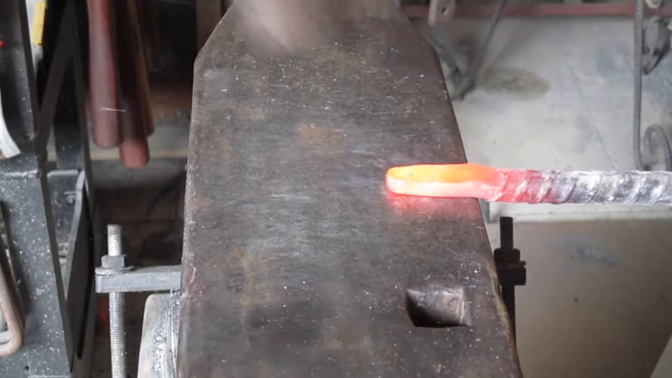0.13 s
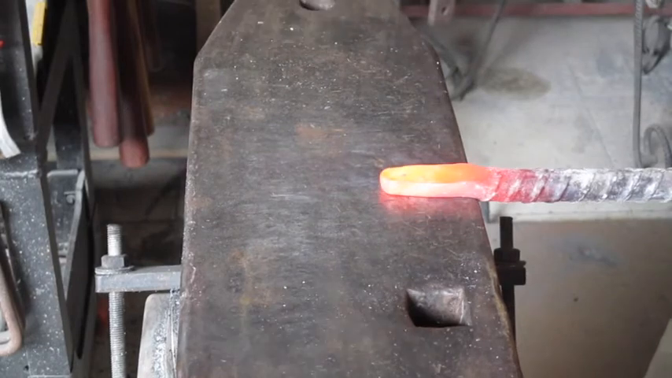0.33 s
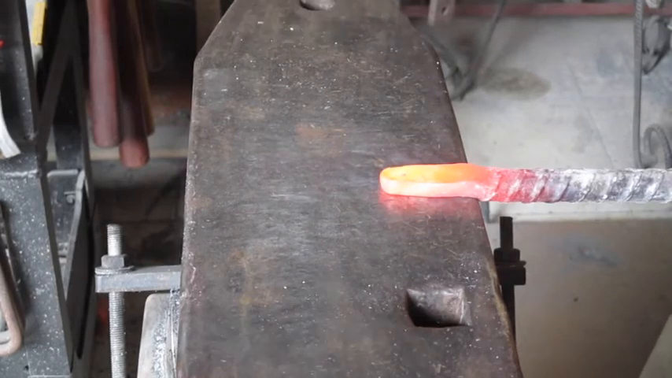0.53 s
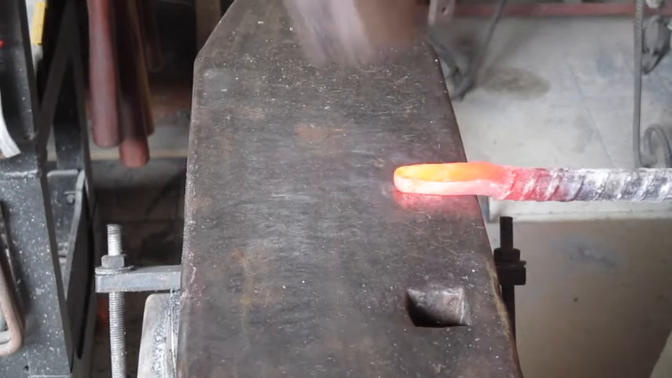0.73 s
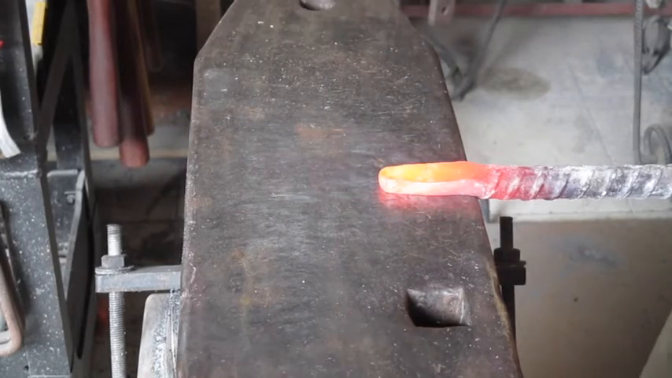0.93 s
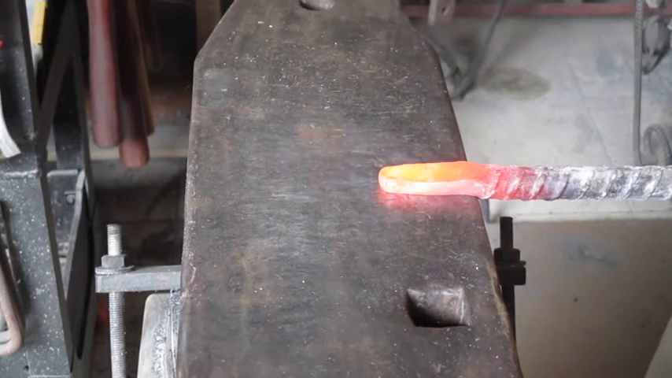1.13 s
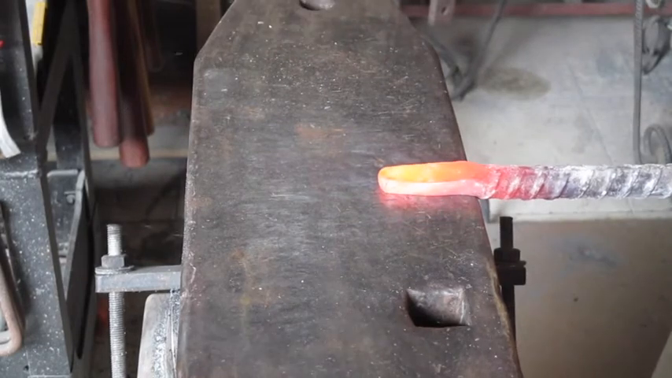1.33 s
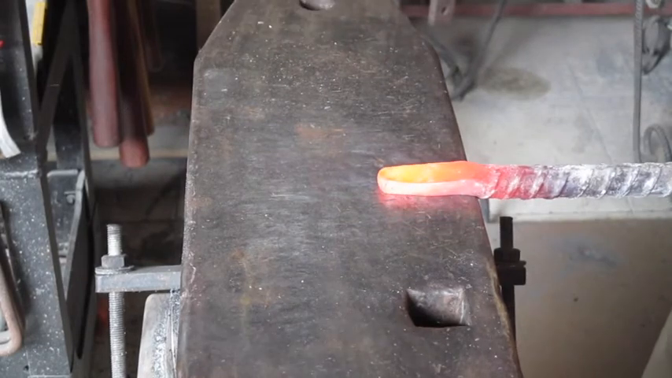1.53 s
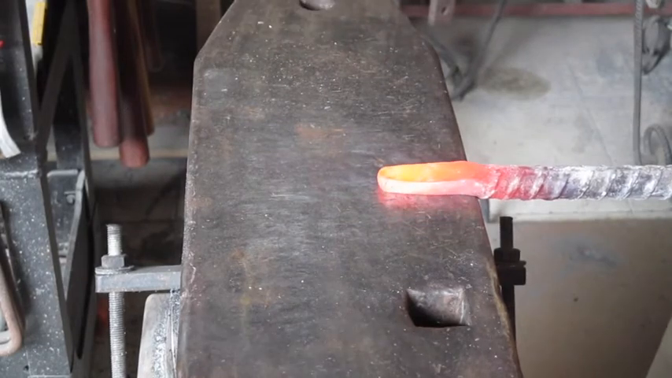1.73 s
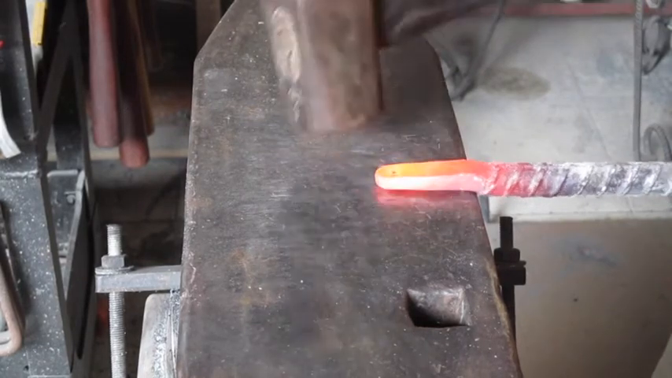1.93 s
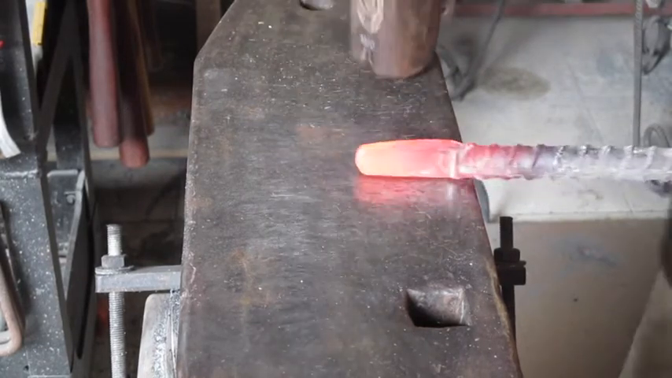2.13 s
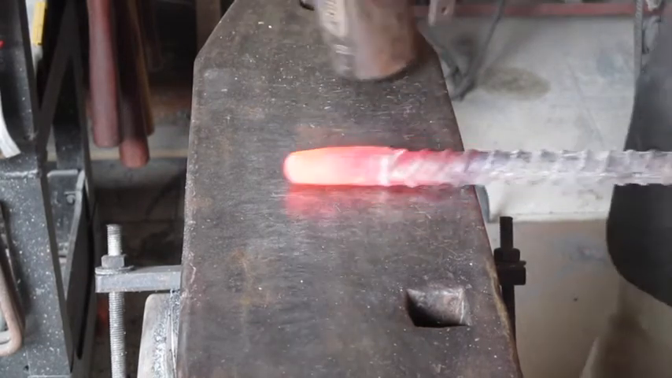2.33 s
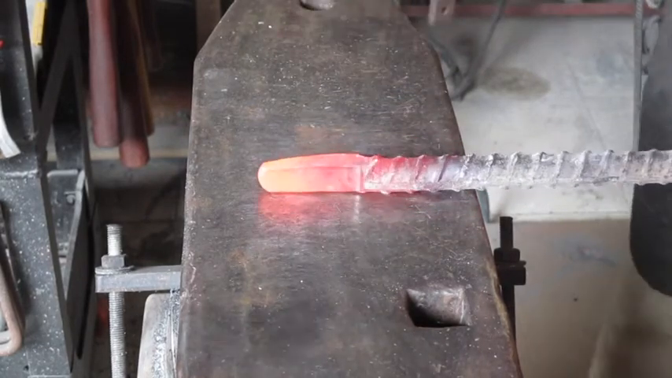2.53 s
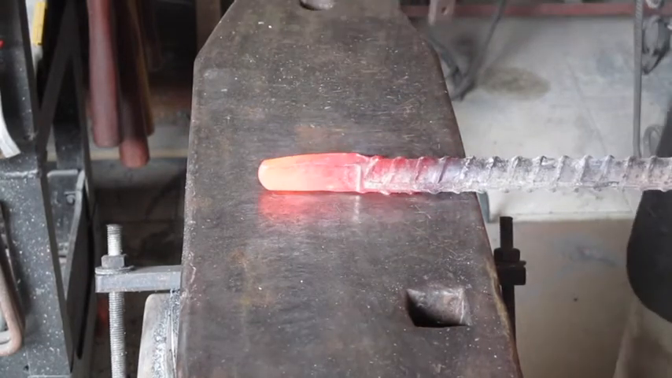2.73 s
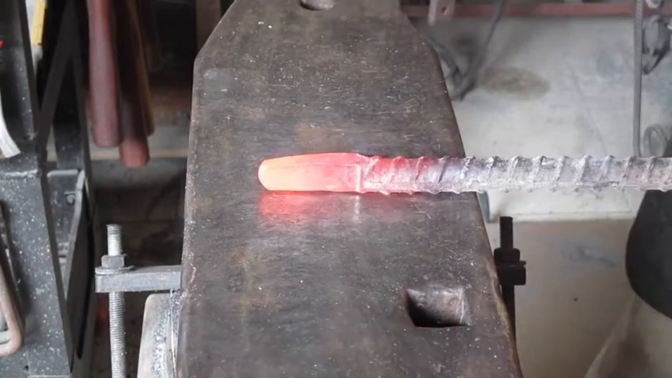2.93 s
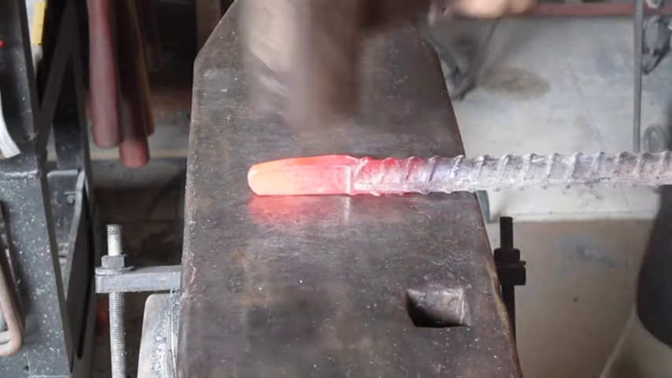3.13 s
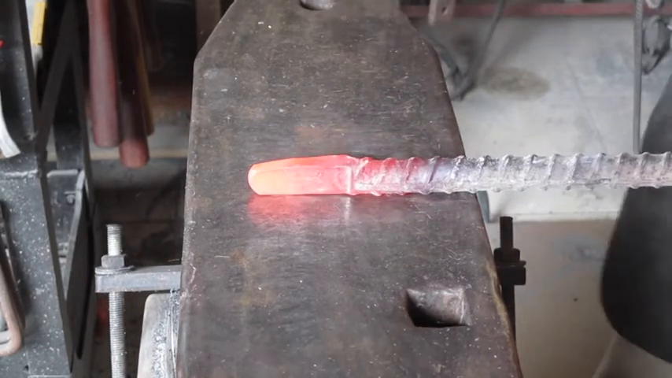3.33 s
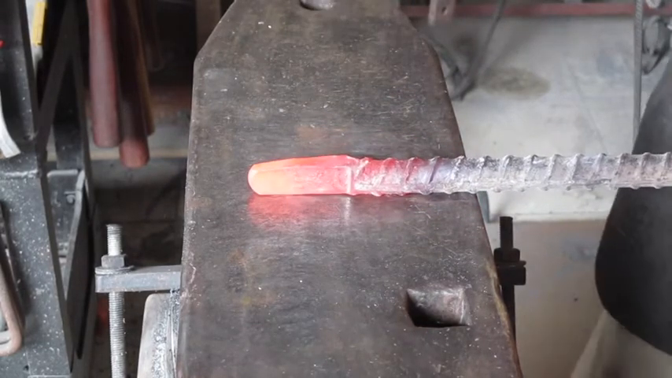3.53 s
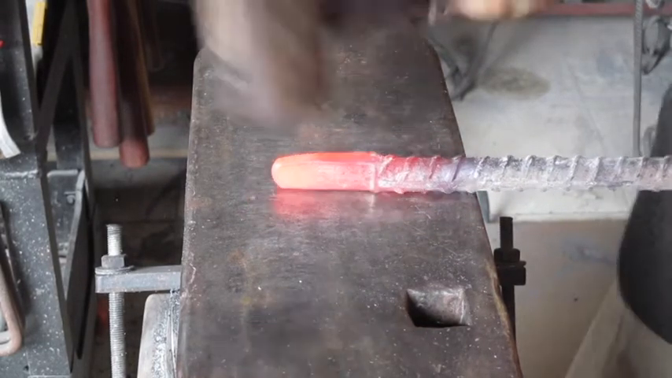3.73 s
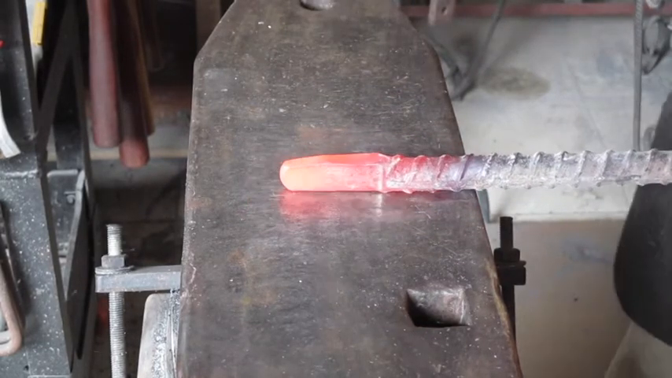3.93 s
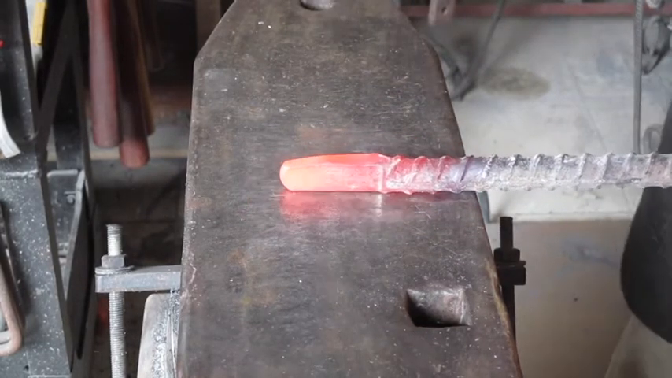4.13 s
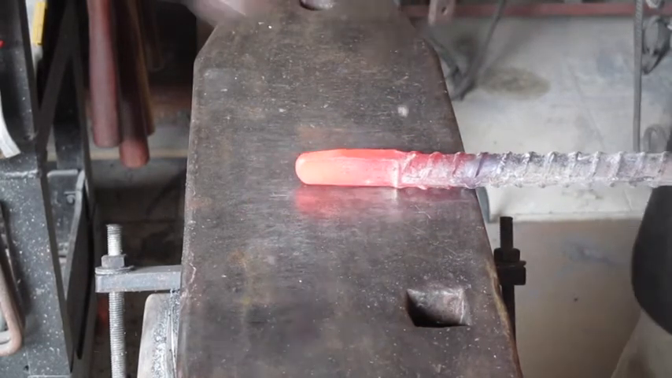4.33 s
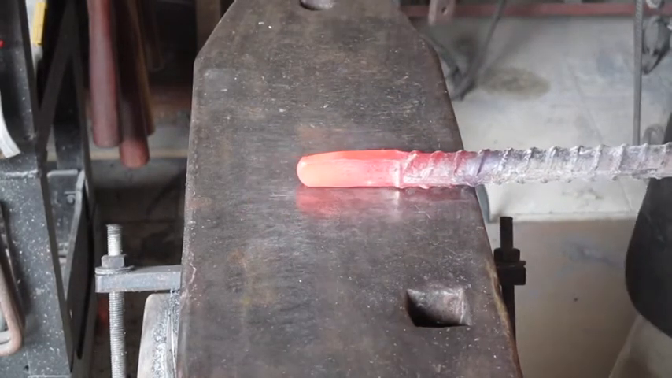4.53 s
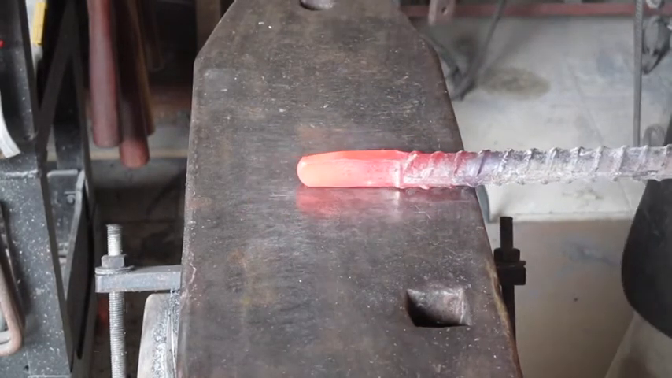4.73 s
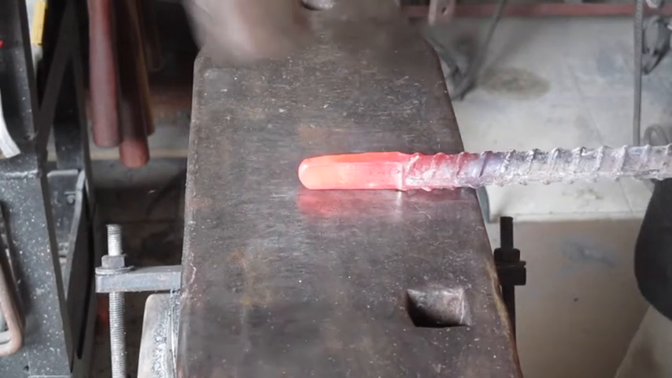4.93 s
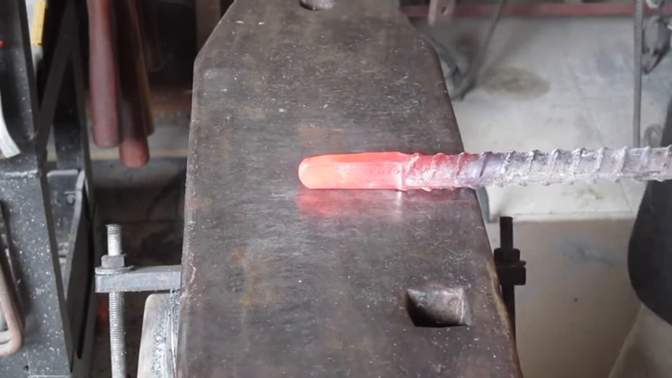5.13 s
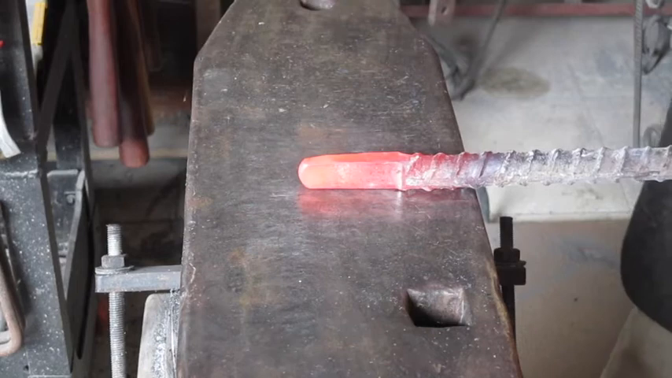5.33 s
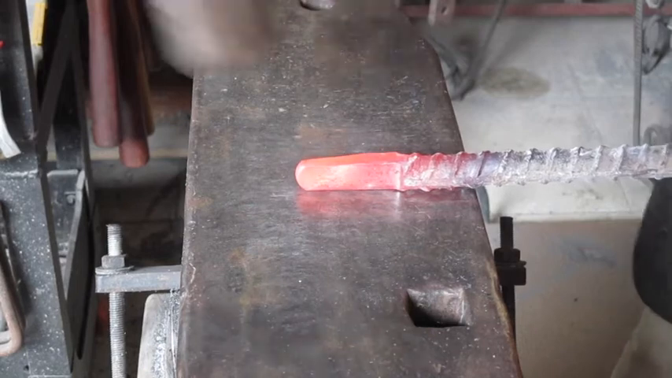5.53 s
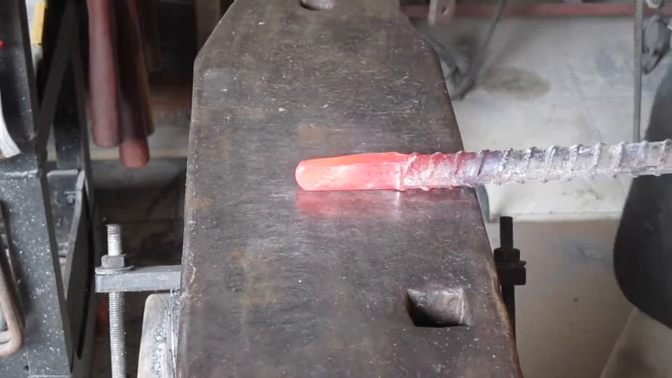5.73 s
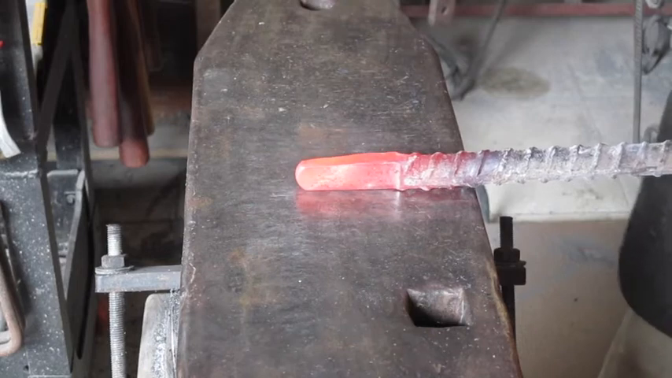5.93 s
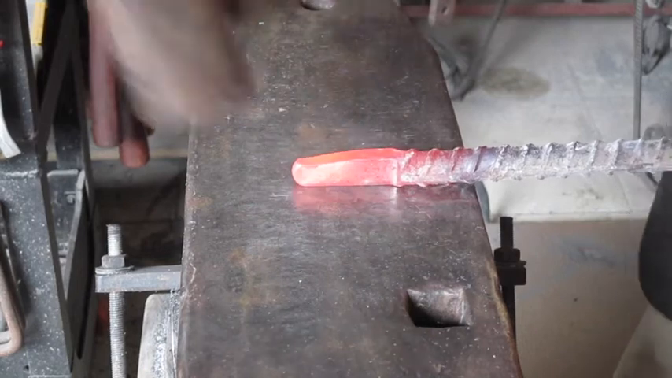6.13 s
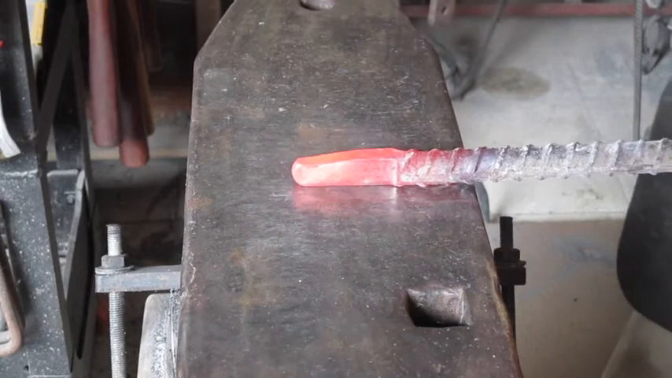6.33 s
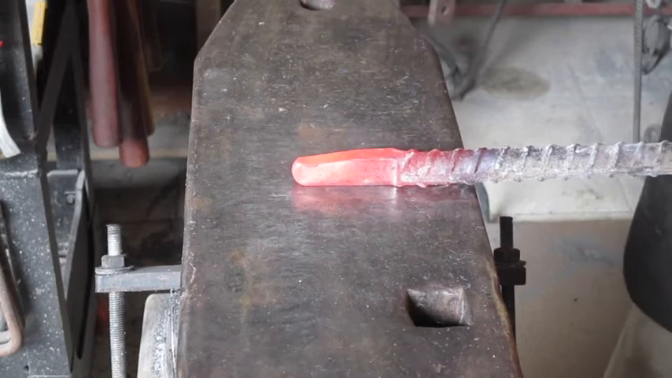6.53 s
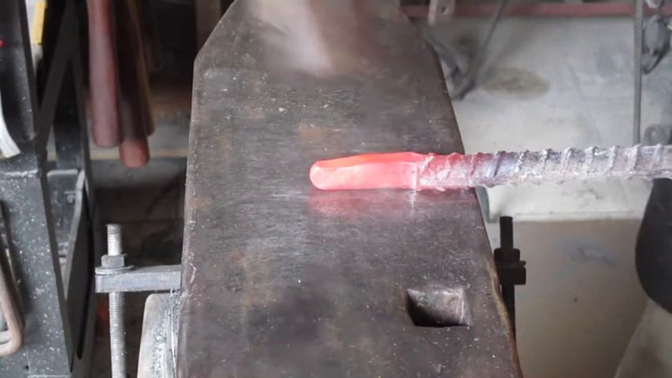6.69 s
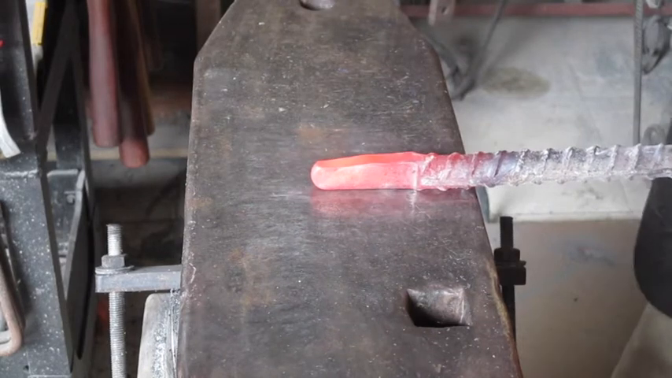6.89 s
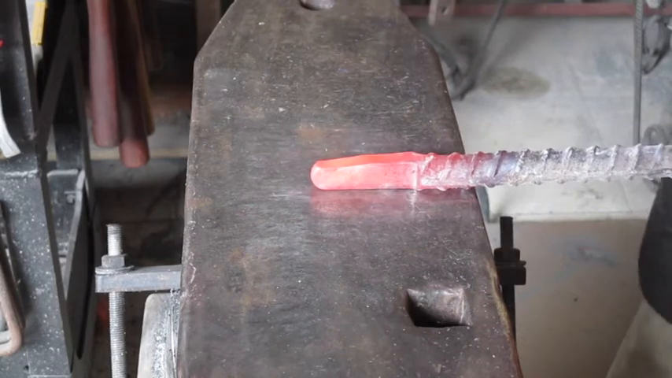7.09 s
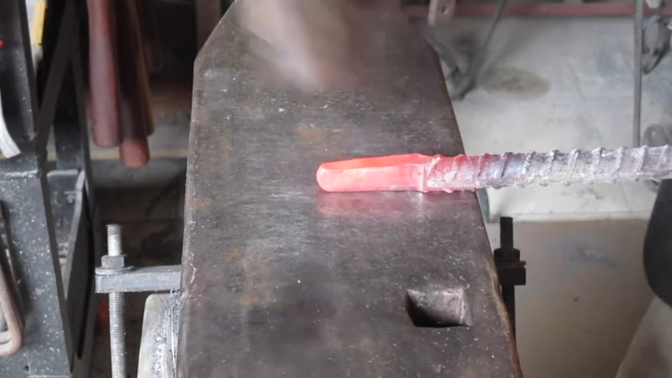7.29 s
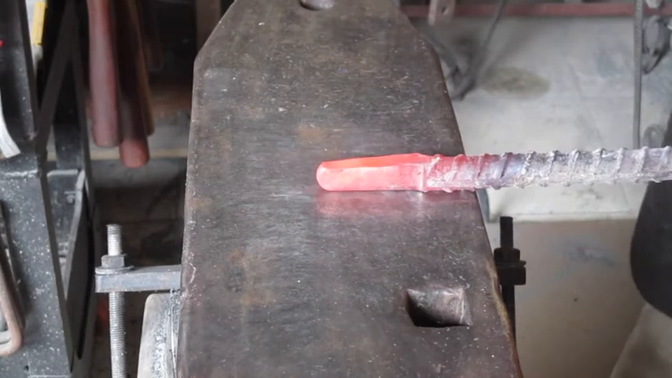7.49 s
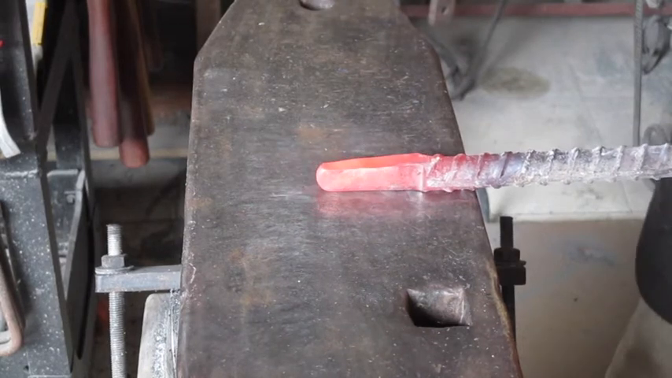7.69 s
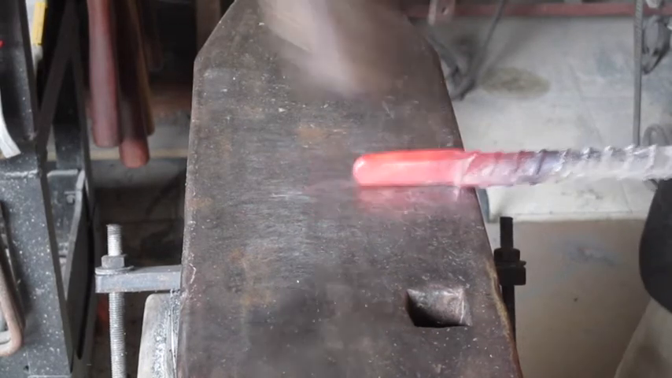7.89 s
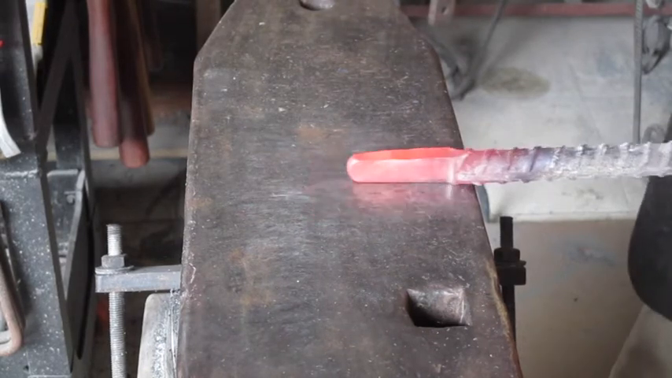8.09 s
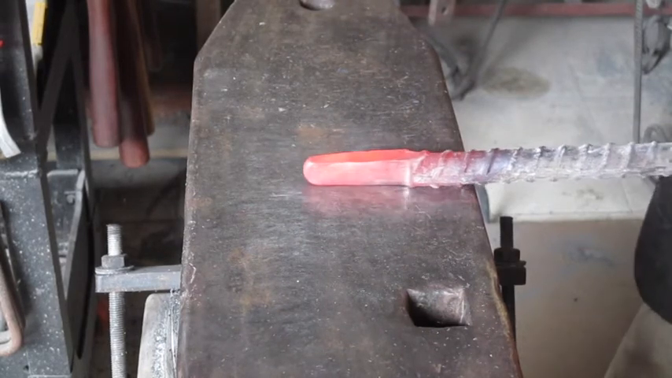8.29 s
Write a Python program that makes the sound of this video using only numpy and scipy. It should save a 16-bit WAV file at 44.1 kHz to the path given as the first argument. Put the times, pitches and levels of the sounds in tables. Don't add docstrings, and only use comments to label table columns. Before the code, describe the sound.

In a hard-walled forge, a hammer hits a hot bar on an anvil roughly every 0.6 seconds: dull thud, crack, short bar clang, thin high rings. After four blows it bounces lightly four times on the bare face, the bar scrapes softly, then nine more blows follow. Close microphone catches puffs of air; the room answers each hit and a fan hums far off.

```python
import sys
import numpy as np
from scipy import signal
from scipy.io import wavfile

SR = 44100
rng = np.random.default_rng(int(sys.argv[2]) if len(sys.argv) > 2 else 0)


def put_to_file(sound):
    columns = np.atleast_2d(sound).T
    safe = np.clip(columns, -1, 1)
    whole_steps = np.round(safe * 32767)
    wavfile.write(sys.argv[1], SR, whole_steps.astype(np.int16))


def amplitude_ratio(level_db):
    exponent = np.asarray(level_db, float) / 20
    return 10 ** exponent


N = 368235


def rms_one(x):
    return x / np.sqrt(np.mean(x ** 2) + 1e-20)


def at_hz(points, hz):
    table_hz, value = np.transpose(points)
    return np.interp(np.log(hz), np.log(table_hz), value)


def band(x, low_hz, high_hz):
    sos = signal.butter(2, [low_hz, min(high_hz, .45 * SR)], "band", fs=SR, output="sos")
    return signal.sosfilt(sos, x)


def mode(t, hz, level_db, t60_s):
    return amplitude_ratio(level_db - 60 * t / t60_s) * np.sin(2 * np.pi * hz * t)


def alternating(t, modes):
    return sum(mode(t, *m) * (-1) ** k for k, m in enumerate(modes))


def bell(t, s, level_db, spread_s):
    return amplitude_ratio(level_db) * np.exp(-((t - s) / spread_s) ** 2)


def add(out, s, sound):
    i = round(s * SR)
    out[i:i + len(sound)] += sound[:N - i]


def coloured(size, gain):
    white = rng.standard_normal((2, size))
    edges_hz = 25 * 2 ** np.arange(0, 9.7, 1 / 3)
    out = np.zeros(size)
    for k, (low_hz, high_hz) in enumerate(zip(edges_hz, edges_hz[1:])):
        out += gain(np.sqrt(low_hz * high_hz)) * band(white[k % 2], low_hz, high_hz)
    return out


def spray(count):
    size, contact_db = SR // 20, 19.5
    grit = rng.standard_normal((count, 2, size))
    return grit + amplitude_ratio(contact_db) * (np.arange(size) == SR // 1500)


def burst(grit, low_hz, high_hz, level_db, t60_s):
    return band(grit, low_hz, high_hz) * amplitude_ratio(level_db - 60 * np.arange(len(grit)) / SR / t60_s)


# f/Hz, density/dB per Hz
FAN_COLOUR = [(18, -34.5), (30, -3.5), (59, -5), (384, -7.5), (735, -13), (2200, -22.5), (6200, -33),
              (15000, -46.5)]
# t/s, level/dB
FAN_LEVEL = [(0.0, -57.5), (8.35, -60)]


def fan():
    s, level_db = np.transpose(FAN_LEVEL)
    noise = coloured(N, lambda hz: amplitude_ratio(at_hz(FAN_COLOUR, hz)))
    return amplitude_ratio(np.interp(np.arange(N) / SR, s, level_db)) * rms_one(noise)


# f/Hz, level/dB, t60/s
THUD_MODES = [(180, -3, 0.017), (399, -7, 0.034), (711, 4.5, 0.014), (1072, -0.5, 0.017),
              (1326, 1.5, 0.016), (1573, 1.5, 0.016), (1803, 5, 0.0068)]


def thud(t):
    return amplitude_ratio(-8.5) * alternating(t, THUD_MODES) * (1 - np.exp(-t / 0.00092))


# f/Hz, level/dB, t60/s
WAIST_MODES = [
    (2008, -1, 0.028),
    (2022, -17.5, 0.31),
]


def waist(t):
    return sum(mode(t, *m) for m in WAIST_MODES)


# multiple of lowest ring, level/dB, t60/s
BAR_MODES = [(1., 3.5, 0.024), (1.388, 9, 0.01), (1.801, 3, 0.022), (2.29, 6, 0.013), (2.811, 3, 0.019)]


def bar_ring(t, lowest_hz, bar_db, tilt_db, droop_db):
    scatter_db, linger_db, linger_t60_s = 1, -26.5, 0.2
    out = np.zeros(len(t))
    for k, (times, level_db, t60_s) in enumerate(BAR_MODES):
        shape_db = tilt_db * (k - 2) - droop_db * (k - 2) ** 2
        ring_db = bar_db + shape_db + level_db + 4.5 + scatter_db * rng.standard_normal()
        out += mode(t, lowest_hz * times, ring_db, t60_s)
        out += mode(t, lowest_hz * times, ring_db + linger_db, linger_t60_s)
    return out


# f/Hz, level/dB, t60/s
HEAD_MODES = [(5300, -22.5, 0.1), (10450, -12, .14), (12300, -21.5, 0.13), (14500, -24.5, .2)]


def head_ring(t, hammer_db):
    scatter_db = 1
    out = np.zeros(len(t))
    for hz, level_db, t60_s in HEAD_MODES:
        out += mode(t, hz, hammer_db + level_db + scatter_db * rng.standard_normal(), t60_s)
    return out


# t/s, crack level/dB, clang level/dB, anvil waist level/dB, hammer level/dB
BLOWS = [(0.085, -13, -11, -14, -13.5), (0.674, -14.5, -9, -13, -13), (1.253, -15.5, -10, -15.5, -45),
         (1.844, -13.5, -16, -20.5, -26), (3.125, -17.5, -13, -26, -34), (3.721, -16, -11.5, -17, -13.5),
         (4.293, -19, -12, -18, -19), (4.884, -20, -30, -22.5, -21), (5.489, -21.5, -15.5, -20.5, -18.5),
         (6.082, -21, -13.5, -21.5, -21), (6.674, -16, -12, -20.5, -23), (7.282, -17.5, -15, -19, -45.5),
         (7.881, -14, -11, -16.5, -33)]
# lowest ring f/Hz, level/dB, tilt/dB per mode, droop of outer modes/dB
GRIPS = [(3050, -32, -1.5, -2), (3062, -26.5, -6.5, 1.2), (3080, -29, -1, -.5), (3040, -22.5, -0.5, 1.5),
         (2993, -13.5, 0.25, 1.3), (3021, -20, -1.5, -1), (3028, -20.5, 0.2, -0.7),
         (2988, -19, -1.76, -0.3), (2980, -24, -3, 0.5), (2937, -24, -.3, 0), (2973, -19, -1.1, 1.2),
         (2960, -23.5, 1, 1), (2970, -15, -0.5, -0.4)]


def blows():
    out, t = np.zeros((2, N)), np.arange(SR) / SR
    rise = 1 - np.exp(-t / 0.00021)
    push, bend = thud(t), waist(t)
    send_db = np.array([0, -2.5, -5, 1.5])
    for blow, grip, grit in zip(BLOWS, GRIPS, spray(len(BLOWS))):
        s, crack_db, clang_db, waist_db, hammer_db = blow
        body = push + head_ring(t, hammer_db)
        spit = np.zeros(SR)
        spit[:SR // 20] += burst(grit[0], 7000, 14000, crack_db + 5.5, 0.024)
        spit[:SR // 20] += burst(grit[1], 2100, 5500, clang_db + 6.5, 0.025)
        parts = np.array([body, bar_ring(t, *grip), amplitude_ratio(waist_db + 11) * bend, spit]) * rise
        add(out[0], s - .0004, parts.sum(axis=0))
        add(out[1], s - .0004, amplitude_ratio(send_db) @ parts)
    return out


def floor_echo(hits):
    out = np.zeros(N)
    add(out, .0041, amplitude_ratio(-6.5) * band(hits, 290, 4200))
    return out


# f/Hz, level/dB, t60/s
SHOP_MODES = [(178, -5.5, 0.53), (235.8, -4, 0.48), (393.6, 2, 0.28), (438.7, 1, 0.37), (760, -18, 0.5),
              (784, -14, 0.32), (960, -7.5, 0.59), (1142, -5.5, 0.46), (1253, -11.5, 0.4), (1328, -5, .39),
              (1477, -9, 0.65), (1528, -7.5, .46), (1582, -6, 0.18), (1690, -10, 0.18)]
# f/Hz, t60/s
SHOP_T60 = [(100, 0.067), (260, 0.73), (700, 0.48), (1840, 0.61), (4850, 0.53), (12800, 0.38)]
# f/Hz, density/dB per Hz
SHOP_COLOUR = [(60, 2.5), (200, 1.5), (500, 2), (1500, 1), (4000, -2.5), (9000, -3), (16000, -9)]
# t/s, level/dB, spread/s
WALLS = [
    (.007, -6.5, 0.0022),
    (0.029, -4.5, 0.0083),
]


def shop(sent):
    build_s, early_db, late_gain_db, late_s, wall_hz = .02, -6, 8, .38, 3000
    t = np.arange(int(1.2 * SR)) / SR
    plain = np.tanh(t / build_s) * amplitude_ratio(early_db + late_gain_db * np.tanh(t / late_s / 2))
    walls = sum(bell(t, *wall) for wall in WALLS)

    def echo_gain(hz):
        decay = amplitude_ratio(at_hz(SHOP_COLOUR, hz) - 60 * t / at_hz(SHOP_T60, hz))
        return decay * (plain + walls / (1 + hz / wall_hz))

    diffuse = coloured(len(t), echo_gain)
    tones = amplitude_ratio(-17) * alternating(t, SHOP_MODES) * (plain + walls)
    return amplitude_ratio(-28.0) * signal.fftconvolve(sent, diffuse + tones)[:N]


# t/s, level/dB, spread/s
SWINGS = [(0.251, -57.5, 0.12), (0.579, -51, 0.059), (1.11, -42.5, 0.093), (2.57, -64, .05),
          (3.28, -50.5, 0.14), (3.81, -56.5, 0.063), (4.211, -52, 0.097), (6.33, -53, 0.13),
          (6.79, -56.5, 0.082), (7.3, -79, .15), (8.3, -63.5, 0.11)]


def moving_air():
    still_db, blast_db, blast_t60_s = -70.5, -45.5, 0.81
    lumps = rms_one(band(rng.standard_normal(N), 2.7, 40))
    air = rms_one(band(rng.standard_normal(N), 45, 140))
    flow = amplitude_ratio(still_db) + sum(bell(np.arange(N) / SR, *swing) for swing in SWINGS)
    blast = amplitude_ratio(blast_db - 60 * np.arange(SR) / SR / blast_t60_s)
    for blow in BLOWS:
        add(flow, blow[0], blast)
    return flow * rms_one(air * amplitude_ratio(1.2 * lumps))


# t/s, level/dB, f/Hz
GUSTS = [(0.547, -42.5, 201), (0.569, -43, 117.4), (0.611, -47, 168), (0.643, -51, 199), (1.021, -57, 51.5),
         (1.046, -51, 94.2), (1.066, -34, 58), (1.09, -32.5, 178), (1.124, -43, 64.6), (1.168, -44, 49.6),
         (1.223, -49.5, 199), (1.8, -52.5, 83), (3.41, -48, 99), (3.542, -46, 86.4), (3.624, -53.5, 61.9),
         (3.644, -57.5, 94.2), (3.683, -51, 75.4), (4.127, -44.5, 135), (4.159, -42.5, 126),
         (4.242, -35.5, 120.5), (6.199, -51, 188), (6.245, -35, 146), (6.3, -38.5, 180), (6.334, -37, 189),
         (6.61, -48, 81), (7.239, -42, 82.2), (8.328, -48.5, 180)]


def gusts():
    out, t = np.zeros(N), np.arange(-800, 800) / SR
    for s, level_db, hz in GUSTS:
        phase = rng.uniform(0, 2 * np.pi)
        push = bell(t, 0, level_db + 6.5, 0.48 / hz)
        add(out, s - .015, push * np.cos(2 * np.pi * hz * t + phase))
    return out


# t/s, knock level/dB, click level/dB, tick level/dB
TAPS = [
    (2.055, -20.5, -27.5, -52),
    (2.176, -20, -26, -39),
    (2.2777, -22, -26.5, -60),
    (2.365, -20.5, -32.5, -60),
]
# f/Hz, level/dB, t60/s
KNOCK = [(198, -8, 0.04), (432, -6.5, 0.045), (768, -3, 0.019), (1257, 2.5, 0.0065), (1710, -1, 0.0091)]
# f/Hz, level/dB, t60/s
FACE = [
    [(5600, -56.5, .08)],
    [(10740, -44.5, 0.089), (10400, -60, .1), (12400, -64, .08)],
    [(14750, -61, .06), (5900, -43.5, .08)],
    [(14650, -64, .1), (7150, -67, 0.036)],
]


def taps():
    out, t = np.zeros(N), np.arange(SR // 2) / SR
    knock = alternating(t, KNOCK)
    for (s, knock_db, click_db, tick_db), rings, grit in zip(TAPS, FACE, spray(len(TAPS))):
        add(out, s + 0.00043, amplitude_ratio(knock_db - 3.5) * knock + sum(mode(t, *m) for m in rings))
        add(out, s, burst(grit[0], 1600, 3600, click_db + 11, 0.0295))
        add(out, s, burst(grit[1], 7000, 14000, tick_db, .012))
    return out


# t/s, length/s, level/dB
DRAGS = [
    (2.453, .3, -67),
    (2.854, .2, -63),
]


def drags():
    edge_s, grains_per_s = 0.076, 6000
    now, stroke = np.arange(N) / SR, np.zeros(N)
    grains = rng.standard_normal(N) * (rng.random(N) < grains_per_s / SR)
    for s, length_s, level_db in DRAGS:
        inside_s = np.minimum(now - s, s + length_s - now)
        stroke += amplitude_ratio(level_db) * np.clip(inside_s / edge_s + 1, 0, 1)
    return stroke * rms_one(band(grains, 790, 3970))


# t/s, level/dB, rise/s, t60/s
SCALE = [
    (3.631, -44, .0005, .015),
    (3.646, -55, .002, .25),
    (2.535, -66, .01, .3),
    (7.305, -30, .0005, .02),
]


def scale():
    out, t = np.zeros(N), np.arange(SR // 2) / SR
    for s, level_db, rise_s, t60_s in SCALE:
        grit = rng.standard_normal(len(t))
        add(out, s, burst(grit, 6000, 14000, level_db, t60_s) * np.tanh(t / rise_s))
    return out


# t/s, f/Hz, level/dB, t60/s
CHIP = [
    (3.631, 7500, -50, 0.026),
    (3.631, 6500, -57.5, 0.046),
    (3.645, 7500, -63, 0.36),
    (3.645, 7540, -70, 0.34),
]


def chip():
    out, t = np.zeros(N), np.arange(SR // 2) / SR
    for s, *ring in CHIP:
        add(out, s, mode(t, *ring))
    return out


def scene():
    hits, sent = blows() + taps()
    struck = hits + floor_echo(hits) + shop(sent)
    air = moving_air() + gusts()
    small = drags() + scale() + chip()
    return (fan() + struck + air + small)[None]


def top_cut(x):
    return signal.sosfilt(signal.butter(12, 17130, fs=SR, output="sos"), x)


def record(dry):
    low = signal.butter(1, 25, "high", fs=SR, output="sos")
    cut = signal.cheby2(10, 60, 17100, fs=SR, output="sos")
    heard = signal.sosfilt(np.vstack([low, cut]), dry)
    rounded = heard / (1 + (heard / .85) ** 4) ** .25
    return top_cut(rounded)


dry = scene()
out = record(dry)
put_to_file(out)
```